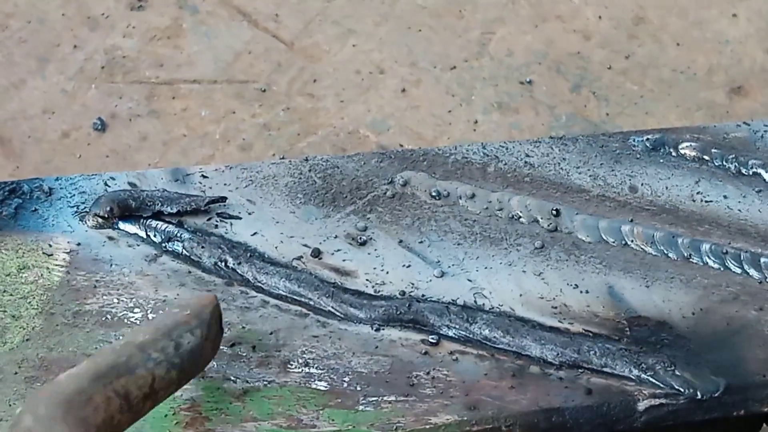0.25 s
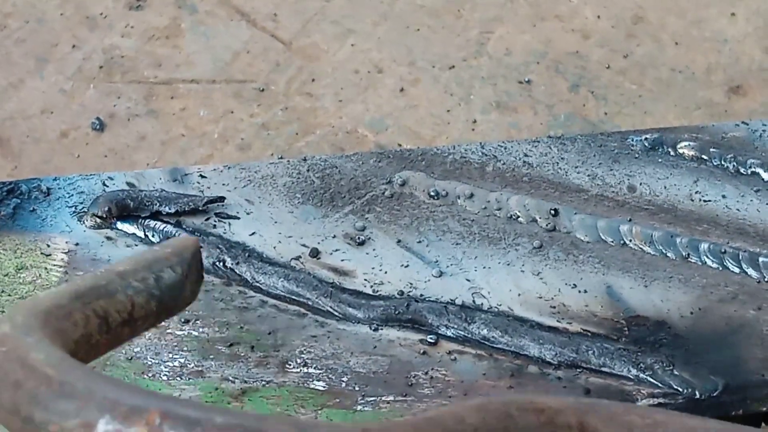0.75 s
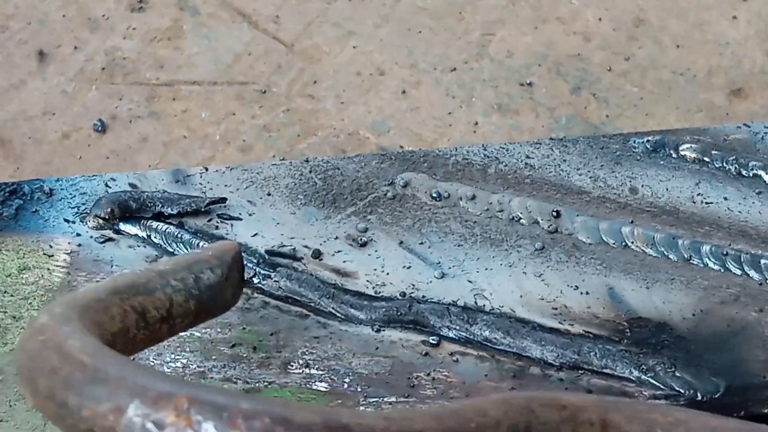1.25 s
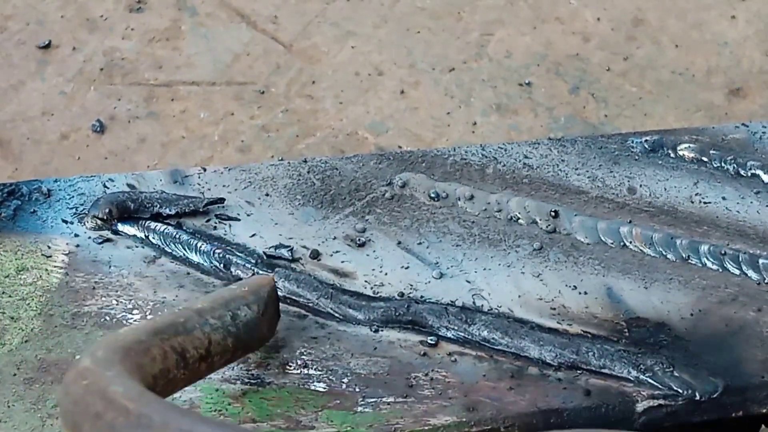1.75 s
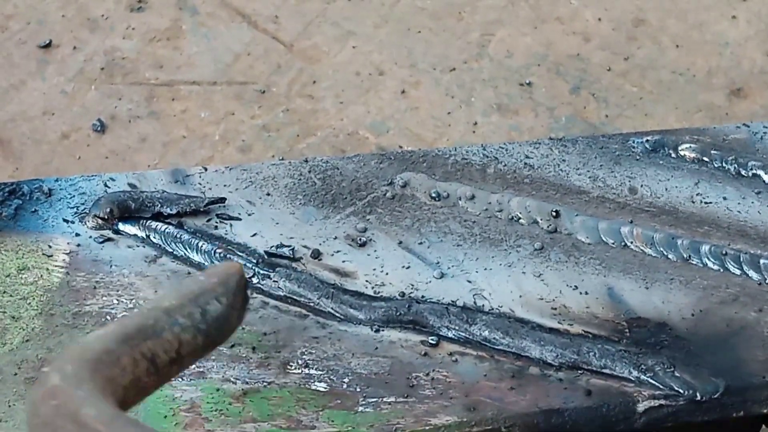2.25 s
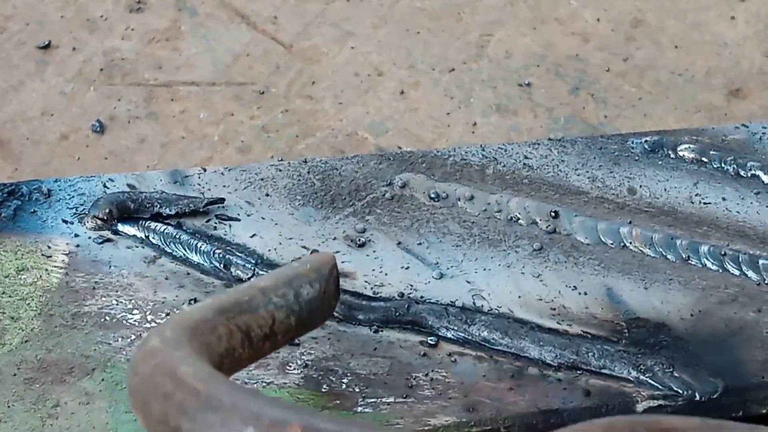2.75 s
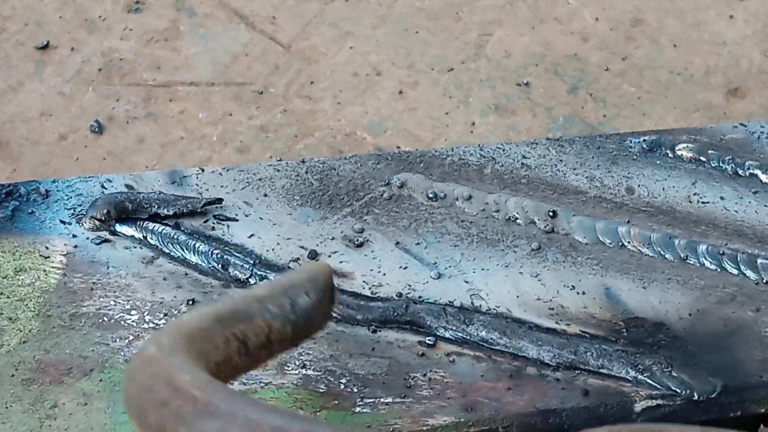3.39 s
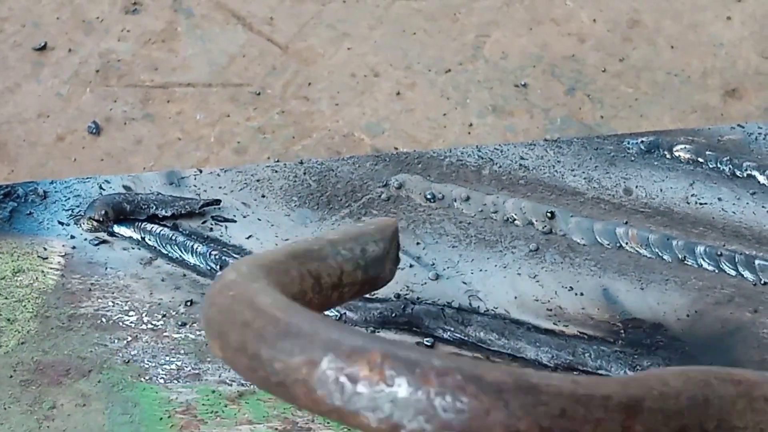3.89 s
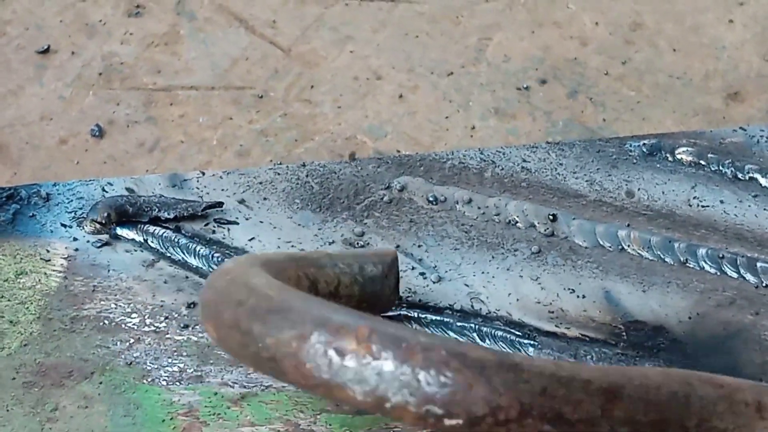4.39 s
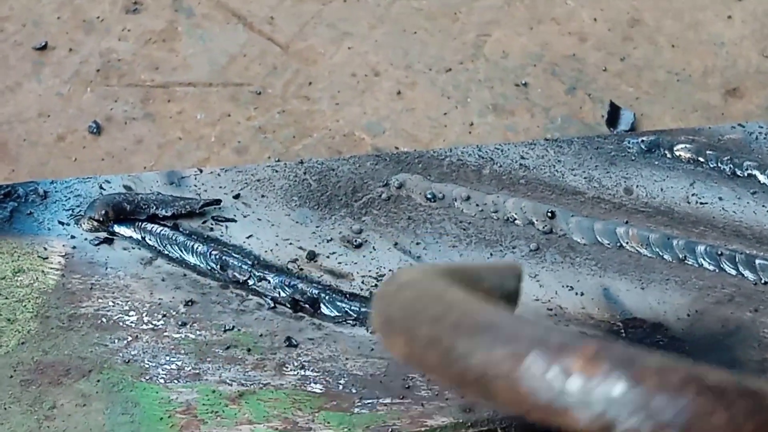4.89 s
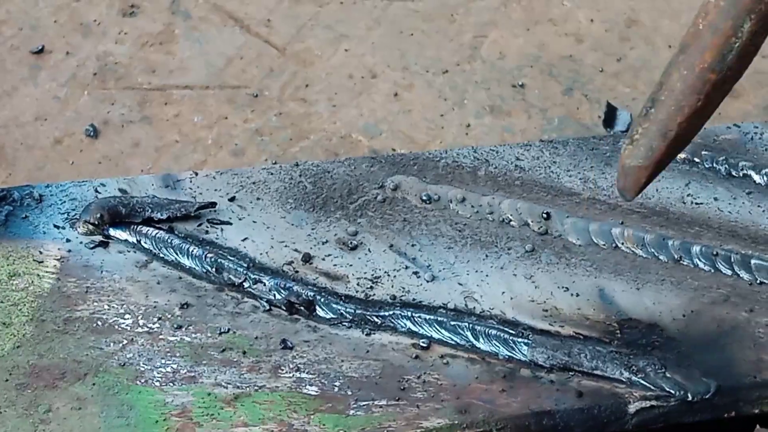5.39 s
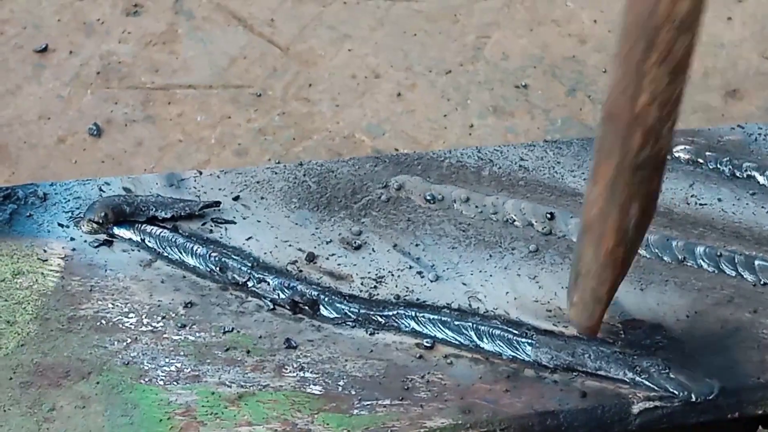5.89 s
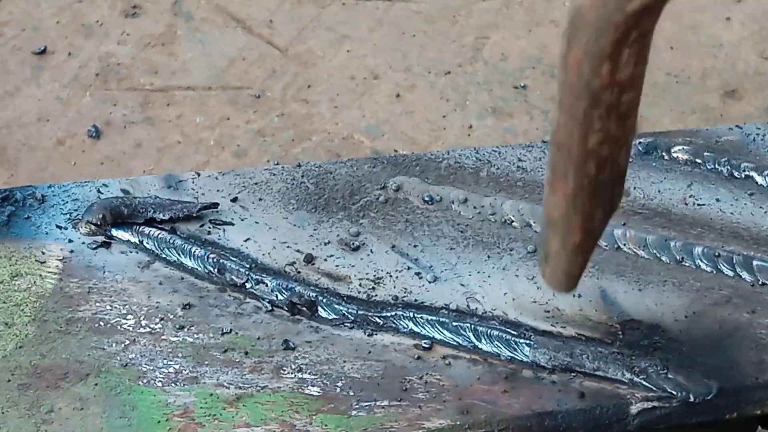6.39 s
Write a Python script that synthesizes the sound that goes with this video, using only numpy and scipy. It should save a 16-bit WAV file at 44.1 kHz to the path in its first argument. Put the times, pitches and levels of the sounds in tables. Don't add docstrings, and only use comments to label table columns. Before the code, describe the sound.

Steel chipping hammer knocks slag off a weld on a thick plate, five bright ringing blows with ticking flakes, over a faint machine drone.

```python
import sys
import numpy as np
from scipy import signal
from scipy.fft import rfft, irfft, next_fast_len
from scipy.io import wavfile
from scipy.ndimage import uniform_filter1d, map_coordinates

SR = 44100
rng = np.random.default_rng(int(sys.argv[2]) if len(sys.argv) > 2 else 0)


def wrap_up_sound(samples):
    columns = np.atleast_2d(samples).T
    tamed = np.clip(columns, -1, 1)
    steps = np.round(tamed * 32767).astype(np.int16)
    wavfile.write(sys.argv[1], SR, steps)


def level_to_linear(level):
    exponent = np.asarray(level, float) / 20
    return 10 ** exponent


N = 292824
TOP_HZ = 15900


def along(points, hz):
    f, v = np.transpose(points)
    return np.interp(np.log(hz + 1), np.log(f + 1), v)


def wobble(rate):
    knots = rng.standard_normal(int(N * rate / SR) + 4)
    return map_coordinates(knots, [np.arange(N) * rate / SR])


def bump(s, half):
    return np.exp(-((np.arange(N, dtype=np.float32) / SR - s) / half) ** 2)


def coloured(x, gain):
    m = next_fast_len(x.shape[-1] + 8192)
    return irfft(rfft(x, m) * gain(np.fft.rfftfreq(m, 1 / SR)), m)[..., :x.shape[-1]]


def rush(spectrum):
    below = [(1, -120), (spectrum[0][0] / 2, -90)]
    above = [(SR / 2, spectrum[-1][1] - 20)]
    points = below + spectrum + above
    x = coloured(rng.standard_normal(N), lambda hz: level_to_linear(along(points, hz)))
    return x / x.std()


def add(track, s, sound):
    part = track[round(s * SR):][:len(sound)]
    part += sound[:len(part)]


def dying(hz, t60, t):
    return np.exp(np.outer(2j * np.pi * hz - np.log(1000) / t60, t)).astype(np.complex64)


def paired(hz, t60, t):
    offset = rng.choice([-1, 1], len(hz)) * rng.uniform(3.0, 12.0, len(hz))
    return dying(hz, t60, t) + level_to_linear(-44.0) * dying(hz + offset, 1.2 * t60, t)


def ringing(modes, db):
    strength = level_to_linear(db) * np.exp(2j * np.pi * rng.random(len(db)))
    return (strength.astype(np.complex64) @ modes).real


# f/Hz, level/dB per Hz
MACHINE_AIR = [(150, -53), (250, -18), (268, -23.5), (313, -13), (371, -14), (531, -6.5), (555, -3),
               (681, -11), (750, -6.5), (987, -19.5), (1150, -37.5), (1500, -45), (2530, -120)]
# f/Hz, level/dB per Hz
DUCT_SPECTRUM = [(30, -13), (60, 0), (200, -4), (1000, -42), (1120, 1.5), (1300, 1), (1520, -8),
                 (1650, -5.5), (1950, -7.5), (2120, -16), (2700, -15), (2970, -22), (3200, -19.5),
                 (4100, -30)]
# f/Hz, level/dB per Hz
HISS_SPECTRUM = [(3500, 1.5), (4300, 3), (4700, -1.5), (5000, 2), (5850, 5.5), (6300, 3), (7250, 3),
                 (7700, -2), (8500, -13.5), (13000, -28), (14000, -20), (14700, -9.5), (15300, -7),
                 (15800, -11)]
# f/Hz, level/dB
MOTOR_LINES = [(1292, -76), (1615, -80), (1696, -82.5), (1943, -82), (2266, -87.5)]
# t/s, level/dB
TONE_SWELLS = [(0.02, -50), (0.2, -59), (0.33, -53.5), (0.57, -51), (0.78, -55), (0.87, -65), (0.99, -54),
               (1.13, -51), (1.23, -61), (1.39, -61), (1.52, -58.5), (1.65, -55), (1.76, -58), (1.94, -55),
               (2.04, -62), (2.18, -52.5), (2.28, -54.0), (2.4, -59.0), (2.49, -56), (2.6, -58.0),
               (2.76, -63), (2.85, -55.0), (2.94, -53), (3.07, -54), (3.16, -53.5), (3.35, -56.5),
               (3.57, -49.5), (3.76, -56.0), (3.88, -55.0), (4.03, -58), (4.15, -71), (4.27, -52),
               (4.45, -51.5), (4.62, -53.5), (4.78, -55), (4.9, -60), (5.0, -57.0), (5.17, -60),
               (5.26, -58.5), (5.38, -49.5), (5.53, -54.5), (5.75, -52.5), (5.93, -51.5), (6.1, -54.5),
               (6.25, -58), (6.38, -53), (6.51, -49), (6.62, -61)]


def workshop():
    air = level_to_linear(-57 + 0.67 * wobble(2.7) + 1.16 * wobble(12)) * rush(MACHINE_AIR)
    duct = level_to_linear(-64.5 + 0.25 * wobble(2.5) + 0.81 * wobble(15)) * rush(DUCT_SPECTRUM)
    hiss = level_to_linear(-80.5 + 0.21 * wobble(3.06)) * rush(HISS_SPECTRUM)
    steady_db, swell_half_s = -64, 0.056
    swell = level_to_linear(steady_db) + sum(level_to_linear(db - 4.5) * bump(s, swell_half_s) for s, db in TONE_SWELLS)
    tone_hz = 566.8 + 0.7 * wobble(15)
    tone = swell * level_to_linear(1.2 * wobble(22)) * np.sin(2 * np.pi * np.cumsum(tone_hz) / SR)
    whine = np.zeros(N)
    for line_hz, db in MOTOR_LINES:
        whine += level_to_linear(db + 3.5 + 1.9 * wobble(8.1)) * np.sin(2 * np.pi * line_hz * np.arange(N) / SR)
    return air + duct + tone + whine + hiss


# t/s, level/dB
ENGINE_NEARNESS = [(0, -75.5), (3.1, -73), (3.3, -59.5), (3.42, -62), (3.55, -67), (3.75, -63.5),
                   (5.45, -64), (5.7, -68.5), (6.64, -76)]
# f/Hz, level/dB per Hz
ENGINE_LOW = [(60, -21.5), (85, -6.5), (98, -12.5), (108, -1.5), (118, -17), (200, -59)]
# f/Hz, level/dB per Hz
ENGINE_HIGH = [(100, -31), (118, -4), (130, 3), (146, -17), (163, 2), (180, -13), (300, -74)]
# t/s, half width/s, f/Hz, level/dB
SHED_BOOMS = [(1.13, 0.092, 160, -65.5), (1.87, 0.11, 157.6, -67.5), (2.43, 0.048, 121.4, -68),
              (3.28, 0.045, 112.7, -57), (3.5, 0.037, 109, -60), (3.62, 0.069, 106, -50),
              (3.93, 0.063, 105.6, -62), (4.42, 0.06, 124.6, -57.5), (4.6, 0.042, 115.2, -54.5),
              (4.92, 0.082, 131.2, -62), (5.4, 0.074, 107.6, -53), (5.87, 0.054, 113.5, -59.5),
              (6.33, .02, 105, -61), (6.38, .02, 100, -63), (6.621, 0.071, 110, -68)]


def engine():
    s, db = np.transpose(ENGINE_NEARNESS)
    near_db = np.interp(np.arange(N) / SR, s, db)
    low = level_to_linear(near_db - 2 + 2.5 * wobble(6)) * rush(ENGINE_LOW)
    high = level_to_linear(near_db - 0.5 + 2.5 * wobble(6)) * rush(ENGINE_HIGH)
    drift = np.cumsum(1 + 0.0312 * wobble(11)) / SR
    booms = np.zeros(N)
    for s, half, hz, db in SHED_BOOMS:
        booms += level_to_linear(db + 1.0) * bump(s, half) * np.sin(2 * np.pi * hz * drift)
    return low + high + booms


# t/s, length/s, start f/Hz, end f/Hz, level/dB
BIRD_CHIRPS = [
    (.77, 0.17, 4800, 4690, -76),
    (.95, 0.11, 4730, 4750, -81),
    (6.52, 0.13, 4450, 4440, -80),
    (.85, .11, 4290, 4230, -83),
]


def chirps():
    out = np.zeros(N)
    for s, length, from_hz, to_hz, db in BIRD_CHIRPS:
        u = np.linspace(0, 1, round(length * SR))
        hz = from_hz + (to_hz - from_hz) * u + 35 * np.sin(2 * np.pi * 30 * length * u)
        husky = 1.3 + uniform_filter1d(rng.standard_normal(len(u)), size=450) * 15
        whistle = np.sin(2 * np.pi * np.cumsum(hz) / SR)
        add(out, s, level_to_linear(db) * np.sin(np.pi * u) ** .5 * husky * whistle)
    return out


# f/Hz, t60/s
SHED_DECAY = [(300, 0.44), (2000, 0.34), (6000, 0.4), (14000, 0.072)]


def shed(x):
    hz, t, z = signal.stft(rng.standard_normal(SR // 2), SR, nperseg=256)
    dying_noise = z * level_to_linear(-60 * t / along(SHED_DECAY, hz)[:, None])
    tail = signal.istft(dying_noise, SR, nperseg=256)[1]
    delayed = np.pad(x, (300, 0))
    return signal.fftconvolve(delayed, tail / np.linalg.norm(tail))[:N]


# t/s, level/dB, depth/dB, t60/s
FLOOR_THUDS = [
    (0.672, -56.5, -3, 0.15),
    (2.125, -56, -1.5, 0.12),
    (3.375, -51.5, -1, 0.13),
    (4.057, -37.5, 3, 0.059),
    (6.244, -44, 4, 0.055),
]
# f/Hz, level/dB, share of depth, relative t60
FLOOR_MODES = [(129.4, -0.5, 0.8, 1.1), (185, 0, 2, 0.84), (246, -3.5, -2, 2.76), (294, -5.5, -1.5, 0.92),
               (697, -3.5, -2.3, 2), (837, -1, -1.4, 2.06)]
# f/Hz, level/dB per Hz
PUFF_SPECTRUM = [(60, -22), (150, -3), (450, -2), (900, 4), (1400, -40)]


def thuds():
    out, t = np.zeros(N), np.arange(SR // 5) / SR
    hz, level_db, share, lasting = np.transpose(FLOOR_MODES)
    for s, db, depth_db, t60 in FLOOR_THUDS:
        push = ringing(dying(hz, lasting * t60, t), db + level_db + share * depth_db)
        puff = coloured(rng.standard_normal(len(t)), lambda f: level_to_linear(along(PUFF_SPECTRUM, f)))
        puff_db = db - 1.5 + 0.52 * depth_db - 60 * t / 0.05
        puff = puff / puff.std() * level_to_linear(puff_db)
        add(out, s, (1 - np.exp(-t / 0.0014)) * (push + puff))
    return out


# t/s, peak level/dB, lower part/dB
FLAKE_LANDINGS = [(0.9677, -67, -14), (0.9844, -72, -10), (2.2882, -76, 2), (2.3082, -65, -6),
                  (2.3461, -74, 1), (2.4039, -78, 4), (2.5237, -71, -7), (4.2593, -49, -9),
                  (4.307, -47, -11.5), (4.3126, -61, -5), (4.3334, -60, -5), (4.3644, -67, 3),
                  (4.3745, -61.5, 0), (4.4016, -68, -2), (4.408, -71, -4), (4.4274, -79, -3),
                  (4.478, -53, -1.5)]
# t/s, peak level/dB, lower part/dB
SLAG_CRACKS = [
    (0.6695, -37, -12),
    (2.1255, -37, -11),
    (3.375, -52, -14),
    (4.059, -23, -40),
]


def flakes():
    out, t = np.zeros(N), np.arange(SR // 20) / SR
    decay = level_to_linear(-60 * t / 0.013) + 0.26 * level_to_linear(-60 * t / 0.085)
    for s, db, lower_db in FLAKE_LANDINGS + SLAG_CRACKS:
        spectrum = [(1500, lower_db - 30), (3000, lower_db - 10), (5000, lower_db), (9000, lower_db),
                    (12500, -14.0), (15000, -4.0)]
        tick = coloured(rng.standard_normal(len(t)), lambda f: level_to_linear(along(spectrum, f)))
        add(out, s, level_to_linear(db + 2.5) * tick * decay)
    return out


# t/s, f/Hz
SINGLE_NOTES = [(.6695, 2788), (.669, 6712), (.67, 2164), (.67, 2271), (.67, 5534), (.68, 6400),
                (.946, 1800), (.946, 1400), (2.119, 6730), (2.158, 2632), (2.127, 1581), (2.125, 3012),
                (2.2994, 2962), (2.5, 3977), (2.2994, 6850), (2.2994, 9800), (3.375, 6760), (3.375, 2260),
                (3.375, 2788), (3.375, 4774), (3.43, 6780), (3.376, 940), (4.056, 1175), (4.056, 3692),
                (4.056, 6944), (4.058, 940), (4.058, 160), (6.35, 3374), (6.244, 3379), (6.244, 5640),
                (6.244, 1130), (6.244, 1630), (6.244, 2783), (6.4, 4613), (6.245, 940), (6.245, 155),
                (6.245, 245), (6.245, 200), (.67, 940), (2.158, 2501), (2.2994, 2501), (2.2994, 3135),
                (6.245, 305)]
# level/dB, t60/s
SINGLE_DECAYS = [(-44, .12), (-42, .06), (-52, .13), (-54, .12), (-56, .12), (-51, .1), (-59, .08),
                 (-57, .09), (-50, .06), (-50, .15), (-37, .72), (-60, .25), (-72, .25), (-85, .3),
                 (-70, .15), (-85, .15), (-36, .06), (-46, .09), (-47, .12), (-52, .12), (-52, .05),
                 (-51, .09), (-29, .13), (-50, .12), (-52, .12), (-40, .09), (-42, .08), (-55, .4),
                 (-30, .11), (-27.5, .063), (-37, .11), (-22, .11), (-42, .12), (-70, .4), (-41, .09),
                 (-35, .08), (-37, .11), (-37, .06), (-50, .09), (-45, .1), (-61, .2), (-62, .33),
                 (-42, .05)]


def single_notes():
    out, t = np.zeros(N), np.arange(SR // 2) / SR
    for (s, hz), (db, t60) in zip(SINGLE_NOTES, SINGLE_DECAYS):
        rising = 1 - np.exp(-t / (0.019 * t60))
        add(out, s, rising * level_to_linear(db - 60 * t / t60) * np.sin(2 * np.pi * hz * t))
    return out


PLATE_NOTES = [1177, 1312, 1415, 1581, 1624, 1687, 1846, 1881, 2001, 2076, 2376, 2501, 2627, 2703, 2962,
               3135, 3379, 3493, 3855, 3977, 4180, 4324, 4413, 4613, 5118, 5423, 5659, 5767, 5912, 6147]
# t60/s, crest level/dB, half-waves, shift/half-waves
PLATE_WAVES = [(0.31, -13, 7.42, 0.832), (0.48, -20, 7.36, 0.841), (0.35, -29, 6.1, 0.95),
               (0.45, -17.5, 9.29, 0.64), (0.28, -18.5, 8.02, 0.38), (0.25, -27.5, 11, 0.87),
               (0.93, -33.5, 9.36, 0.5), (0.47, -36, 3.08, 0.6), (0.5, -27, 9.42, 0.34),
               (0.12, -28.5, 5.37, 0.37), (0.25, -28, 0.97, 0.72), (0.27, -22, 6.74, 0.473),
               (0.25, -28, 7.31, 0.96), (0.15, -26.5, 7.02, 0.17), (0.28, -37, 1.47, 0.14),
               (0.36, -26, 6.45, 0.668), (0.2, -32, 1.92, 0.19), (0.29, -34.5, 3.18, 0.29),
               (0.39, -29.5, 3.6, 0.89), (0.34, -33, 6.12, 0.03), (0.33, -41, 2.26, 0.36),
               (0.3, -37.5, 1.71, 0.27), (0.74, -58.6, 7.19, 0.75), (0.19, -24.5, 9.04, 0.576),
               (0.21, -30.5, 1.87, 0.11), (0.46, -39.5, 8.1, 0.49), (0.15, -27.5, 3.58, 0.92),
               (0.43, -49, 6.01, 0.61), (0.29, -31.5, 1.52, 0.39), (0.32, -36, 1.68, 0.3)]
HAMMER_NOTES = [6372, 6613, 6916, 7193, 7362, 7633, 7900, 8084, 8334, 8811, 8992, 9202, 9335, 9485, 9798,
                10294, 10870, 11000, 11460, 12690, 14300, 14376, 14560, 15008, 15230, 15348, 15500, 15640]
# t60/s, crest level/dB, half-waves, shift/half-waves
HAMMER_WAVES = [(0.23, -29.5, 8.2, 0.83), (0.14, -34.4, 8.56, 0.82), (0.27, -37.2, 8.14, 0.37),
                (0.31, -32, 6.34, 0.59), (0.14, -31, 6.2, 1), (0.19, -36.5, 3.1, 0.78),
                (0.16, -34, 9.2, 0.5), (0.32, -38.0, 3.44, 0.09), (0.23, -37, 6.8, 0.83),
                (0.24, -27.5, 7.53, 0.7), (0.25, -33.5, 9.36, 0.13), (0.29, -41, 7.85, 0.53),
                (0.18, -53, 9.6, 0.49), (0.29, -47, 3.2, 0.92), (0.19, -36.6, 7.17, 0.96),
                (0.27, -46.5, 2.83, 0.89), (0.12, -50, 10, 0.74), (0.2, -38.5, 7.57, 0.75),
                (0.19, -61, 4.85, 0.46), (0.18, -64, 3.43, 0.29), (0.13, -42.7, 3.7, 0.1),
                (0.15, -42.7, 8.6, 0.76), (0.09, -37.3, 3.67, 0.21), (0.3, -54.5, 3.89, 0.05),
                (0.13, -44.2, 8.5, 0.77), (0.23, -39, 3.81, 0.08), (0.13, -38, 3.73, 0.17),
                (0.11, -45, 0.9, 0.77)]
HANDLE_NOTES = [3370, 11890, 12630, 13170, 13810]
# t60/s, crest level/dB, half-waves, shift/half-waves
HANDLE_WAVES = [(0.27, -53, 1.1, 0.22), (0.15, -50, 8.2, 0.06), (0.28, -54, 3.8, 0.07),
                (0.12, -55.0, 2.74, 0.98), (0.12, -49, 4.05, 0.88)]
FED_NOTES = [1581, 2001, 3855]
# feed/per s, t60/s, level/dB
FED_DECAYS = [(12, .38, -2.5), (12, 0.35, -1), (20, .27, -1.8)]


def clear_modes(t):
    hz = np.array(PLATE_NOTES + HAMMER_NOTES + HANDLE_NOTES)
    t60, crest_db, waves, shift = np.transpose(PLATE_WAVES + HAMMER_WAVES + HANDLE_WAVES)
    fed = [PLATE_NOTES.index(note) for note in FED_NOTES]
    feed, t60[fed], fed_db = np.transpose(FED_DECAYS)
    tones = paired(hz, t60, t)
    tones[fed] *= level_to_linear(fed_db)[:, None] * (1 + np.outer(feed, t))
    return hz, crest_db, waves, shift, tones


STRUCK_PLACES = [.1, .126, .653, .754, .9]
SLAG_NOTES = [
    [1177, 4413, 4613, 6147, 2076, 1881, 7900, 9335, 9485, 5423, 1415, 6613, 2703, 7362, 6916],
    [1581, 1846, 2703, 3135, 5118, 5423, 6147, 8334, 9202, 4413, 6613, 2376, 2627, 3855, 7900, 8811, 3493,
     1312, 1881, 2001, 2076, 3977, 1687, 4613],
    [1415, 1881, 2001, 2501, 3379, 5118, 6147, 8084, 7633, 3135, 6372, 8334, 9485, 7900, 2376, 5659, 4613,
     2627, 8811, 5912],
    [1177, 1415, 1624, 2501, 5659, 6147, 6372, 1687, 1581, 5912, 1881, 2001, 9485, 2627, 3135, 4413],
    [1177, 1415, 1581, 2376, 2962, 3135, 4324, 5423, 6372, 6613, 7193, 7633, 8811, 10294, 4613, 8992, 7900,
     7362, 11890, 5118, 1312, 2001, 1881, 1624, 3379, 3370, 4413, 5659],
]
SLAG_CHANGES = [
    [-2, 6, -11, -24, 3, 1.5, 8, 23, 2, 0, 5, 2, 3, -4, -1],
    [-30, -3, -12, -22, -9, 8, 11, 3, -8, 4, 6, -2, -3, -3.5, -6, -3, -10, -1.5, -11, -8, -9, -8, 0, -4],
    [1, -10, 12, 2, -15, 0, -1, -8, 2, -1.5, -5, 1, -2, 14, 4, -1, 4, -5, 1.5, -6],
    [-13, -10, 5.5, 1, 1, -2, -4.5, -1, 0.5, 0, 2.5, 0.5, 2, 0, -5, -1],
    [6.5, -28, 0, 2, 0, -9, -3, 1, -13, 10, 0.5, 4, 5, -12, -0.5, 0.5, -11.5, -4, -13, 0, 1, 0.5, 2, -5.5,
     -10, -10, -1, -5],
]


def strength_at(spot, hz, crest_db, waves, shift):
    slag_db = (hz[:, None] == SLAG_NOTES[spot]) @ np.array(SLAG_CHANGES[spot])
    motion = np.abs(np.cos(np.pi * (waves * STRUCK_PLACES[spot] + shift)))
    return slag_db + crest_db + 20 * np.log10(motion + 0.02)


def crackle(colour, t):
    noise = coloured(rng.standard_normal(len(t)), lambda f: level_to_linear(colour(f)))
    return noise * (level_to_linear(28.0 - 60 * t / 0.036) + level_to_linear(22.0 - 60 * t / 0.11))


# t/s, spot, ring level/dB, rise/s, crunch level/dB
HAMMER_BLOWS = [
    (0.6689, 0.5, -15.5, 0.0025, -49),
    (2.103, 3.5, -38.5, .01, -73),
    (2.1247, 1, -16.5, 0.0079, -63),
    (3.3742, 2, -12.5, 0.0039, -42.5),
    (3.43, 2.5, -27.5, .002, -68),
    (4.0544, 3, -9.5, 0.0013, -43),
    (6.2432, 4, 0.4, 0.0009, -37),
]
# t/s, ring level/dB, rise/s, crunch level/dB
TIP_TAPS = [
    (2.1178, 8.5, 0.0032, -55),
    (2.158, 6, 0.0017, -59),
    (2.299, 1, 0.0021, -73),
]
# f/Hz, level/dB, t60/s
TIP_MODES = [(1416, -74, .48), (1624, -63, .18), (1689, -73, .34), (2081, -73, .14), (2376, -75, .18),
             (2502, -62, .13), (2629, -55, .094), (2706, -72, .1), (3135, -59, .11), (3854, -70, .36),
             (5658, -63.5, .13), (6372, -73, .24), (7193, -74, .29)]
# f/Hz, level/dB per mode
CRUNCH_SPECTRUM = [(350, -58), (1070, -17.5), (1200, -6.5), (1650, -8.5), (2100, -20.5), (2600, -10),
                   (4300, -23.5), (5000, -23), (6000, -21.5), (9000, -23.5), (11000, -38.5), (13000, -46),
                   (15000, -34), (16000, -32)]
# f/Hz, t60/s
CRUNCH_T60 = [(700, 0.17), (1500, 0.21), (4000, 0.22), (9000, 0.22), (15000, 0.18)]
SPOT_TILTS = [0, 9, -0.4, -1, -0.8]


def blows():
    t = np.arange(SR * 2 // 5) / SR
    hz, crest_db, waves, shift, clear = clear_modes(t)
    low_notes, low_lag = 10, 1.9
    contacts = []
    for s, spot, db, rise, crunch_db in HAMMER_BLOWS:
        spot = round(spot)
        mode_db = db + strength_at(spot, hz, crest_db, waves, shift)
        low = ringing(clear[:low_notes], mode_db[:low_notes])
        high = ringing(clear[low_notes:], mode_db[low_notes:])
        contacts.append((s, low, high, rise, crunch_db, SPOT_TILTS[spot]))
    tip_hz, tip_db, tip_t60 = np.transpose(TIP_MODES)
    tip = paired(tip_hz, tip_t60, t)
    for s, db, rise, crunch_db in TIP_TAPS:
        contacts.append((s, 0, ringing(tip, db + tip_db), rise, crunch_db, -5))

    short = t[:len(t) * 2 // 3]
    fade = np.cos(np.pi / 2 * short / short[-1])
    minor_hz = 700 + (TOP_HZ - 700) * rng.random(size=360) ** 1.5
    crowding_db = 6 * np.log10(minor_hz / 5000)
    minor_t60 = along(CRUNCH_T60, minor_hz) * np.exp(0.3 * rng.standard_normal(minor_hz.shape))
    minor = dying(minor_hz, minor_t60, short)
    ring, crunch = np.zeros(N), np.zeros(N)
    for s, low, high, rise, crunch_db, tilt in contacts:
        colour = lambda f: along(CRUNCH_SPECTRUM, f) + tilt * np.log2(np.maximum(f, 600) / 4000)
        rising = 1 - np.exp(-t / abs(rise))
        add(ring, s, rising ** low_lag * low + rising * high)
        uneven_db = 3 * rng.standard_normal(minor_hz.shape) - 1.5
        rattle = ringing(minor, colour(minor_hz) + crowding_db + uneven_db)
        crack = (1 - np.exp(-short / 0.00071)) * crackle(colour, short)
        add(crunch, s, level_to_linear(crunch_db) * fade * (rising[:len(short)] * rattle + crack))
    return ring, crunch


def scene():
    ring, crunch = blows()
    grit = crunch + flakes() + single_notes()
    room = shed(level_to_linear(-14) * grit + level_to_linear(-20) * ring)
    background = workshop() + engine() + chirps()
    return (background + room + thuds() + grit + ring)[None]


def band_limit(x):
    return signal.sosfilt(signal.butter(12, 16650, fs=SR, output="sos"), x)


def record(dry):
    def response(hz):
        bass_cut = 1 + (45 / (hz + 1)) ** 3
        return np.clip((TOP_HZ - hz) / 200, 0, 1) / bass_cut
    return band_limit(coloured(dry, response))


dry = scene()
out = record(dry)
wrap_up_sound(out)
```